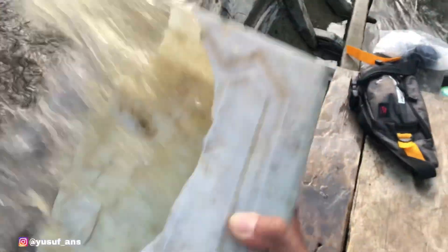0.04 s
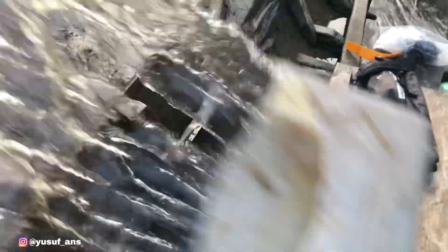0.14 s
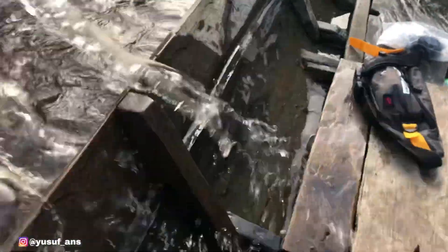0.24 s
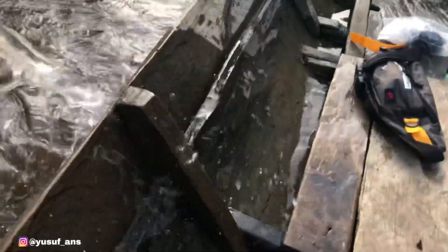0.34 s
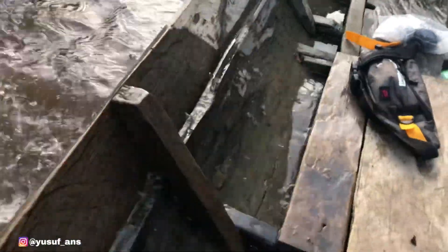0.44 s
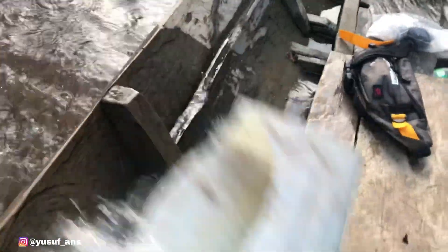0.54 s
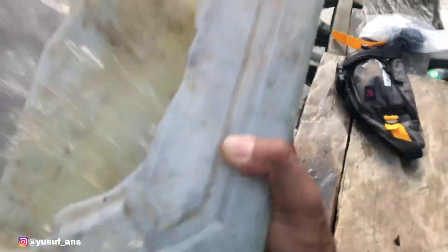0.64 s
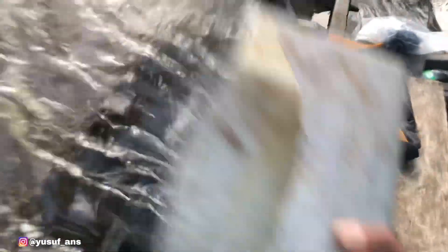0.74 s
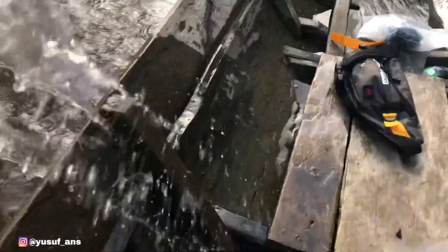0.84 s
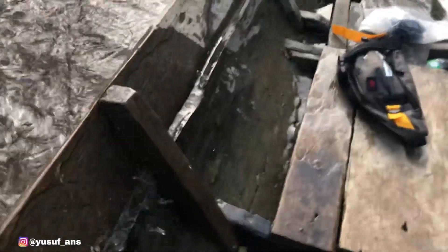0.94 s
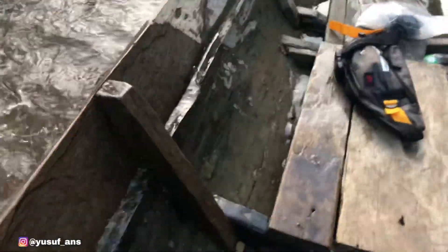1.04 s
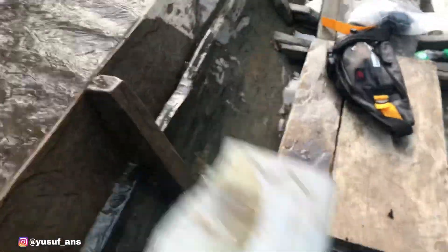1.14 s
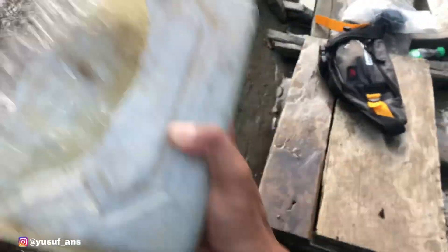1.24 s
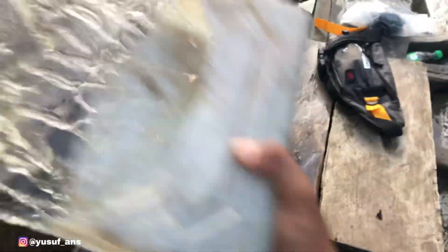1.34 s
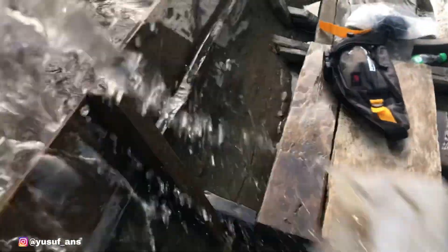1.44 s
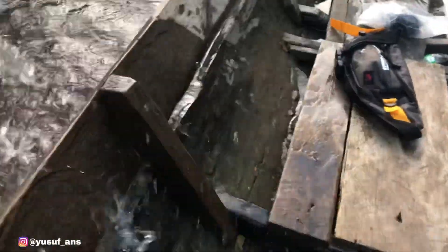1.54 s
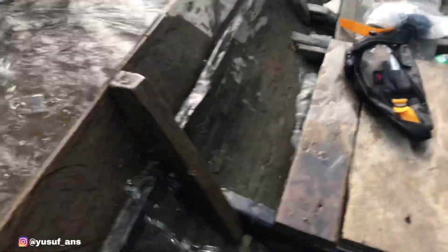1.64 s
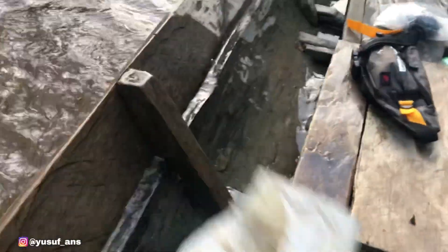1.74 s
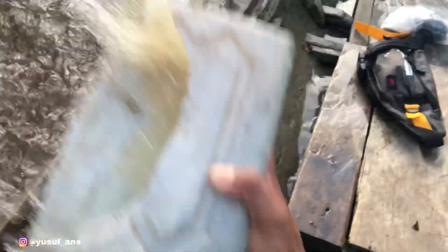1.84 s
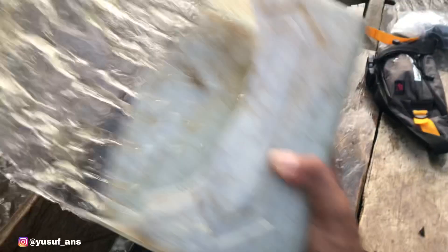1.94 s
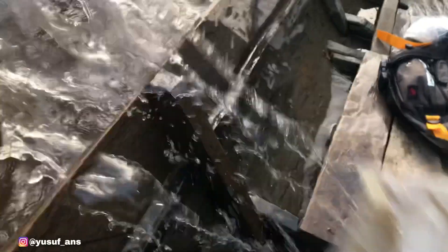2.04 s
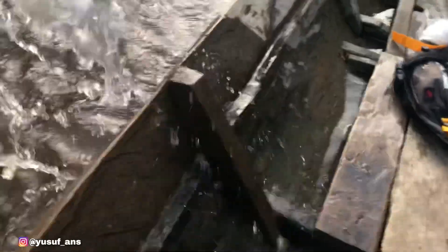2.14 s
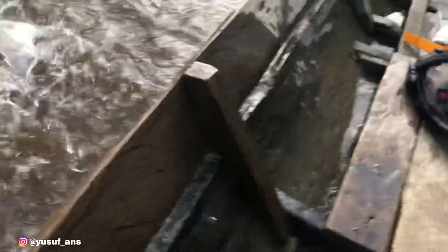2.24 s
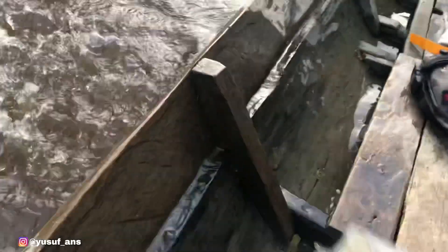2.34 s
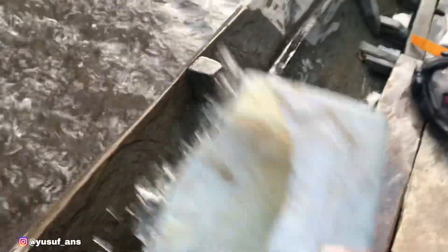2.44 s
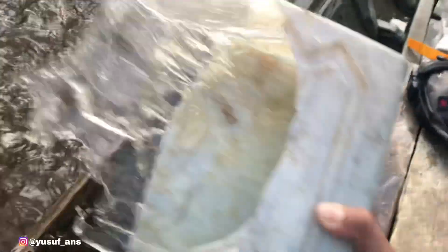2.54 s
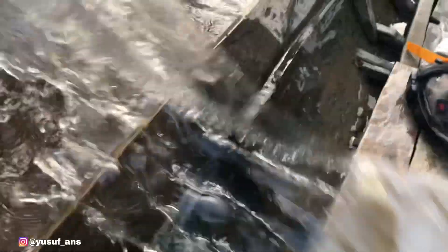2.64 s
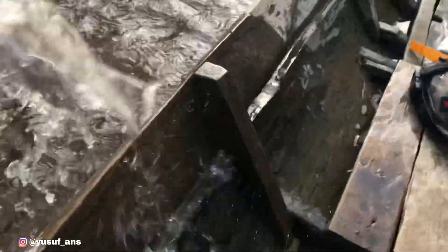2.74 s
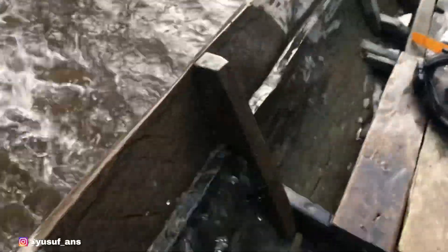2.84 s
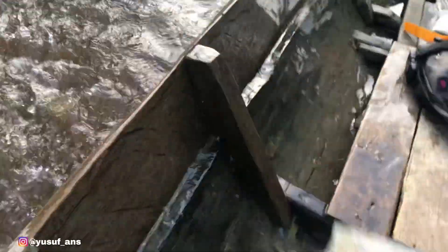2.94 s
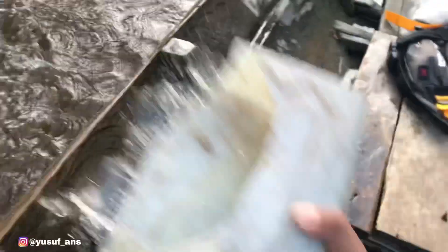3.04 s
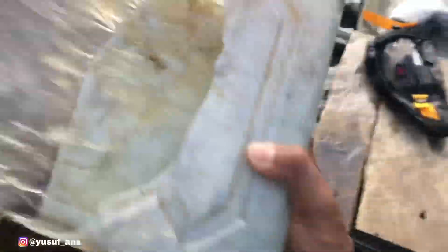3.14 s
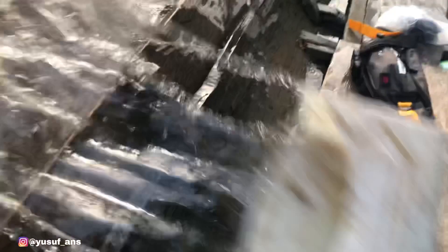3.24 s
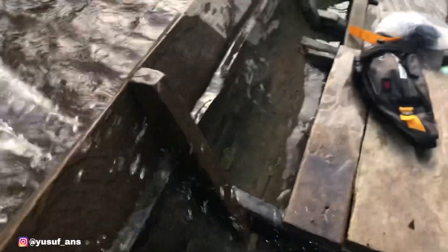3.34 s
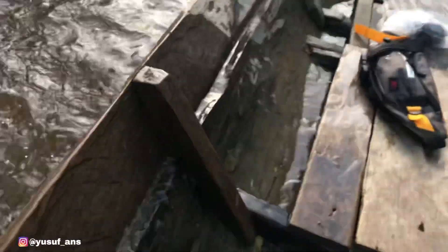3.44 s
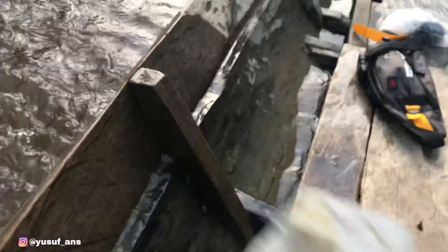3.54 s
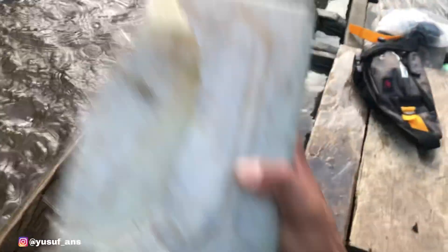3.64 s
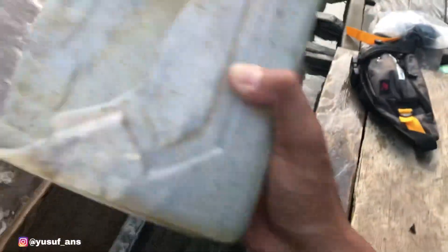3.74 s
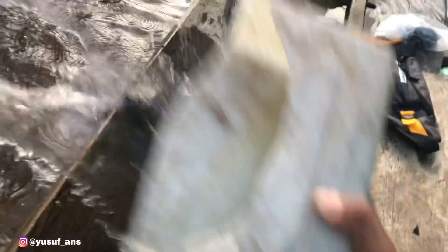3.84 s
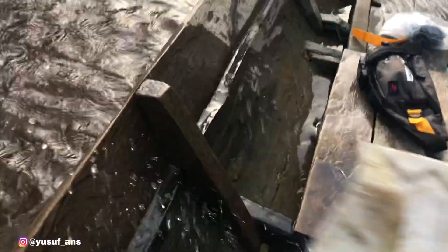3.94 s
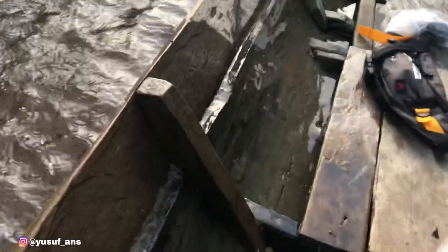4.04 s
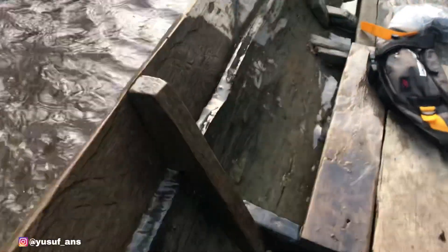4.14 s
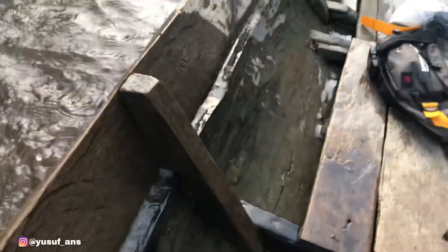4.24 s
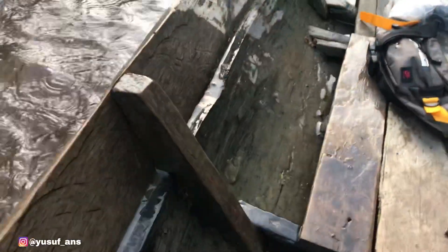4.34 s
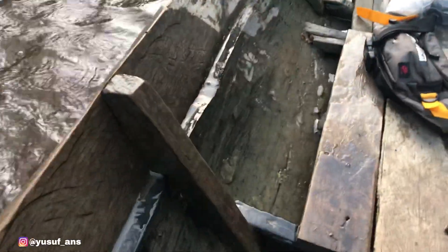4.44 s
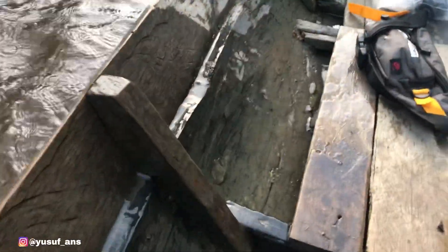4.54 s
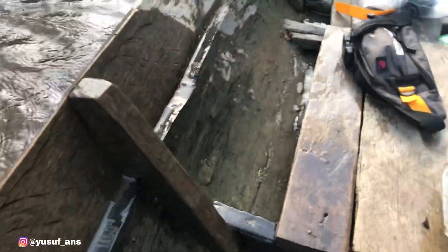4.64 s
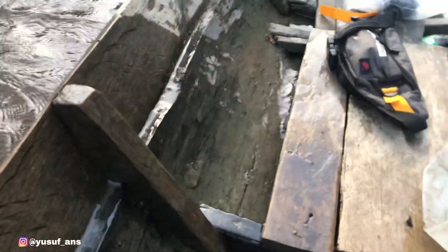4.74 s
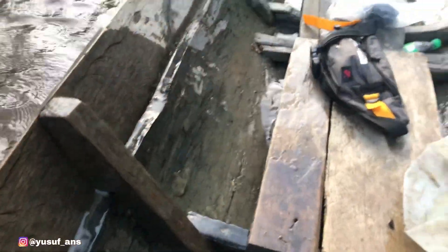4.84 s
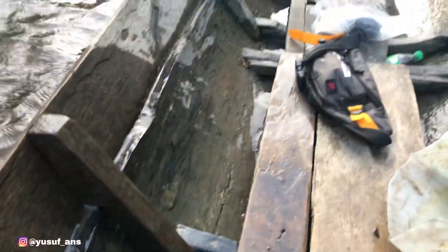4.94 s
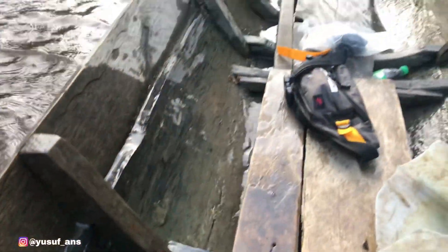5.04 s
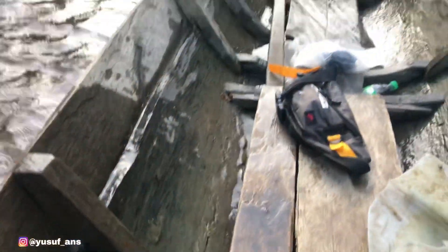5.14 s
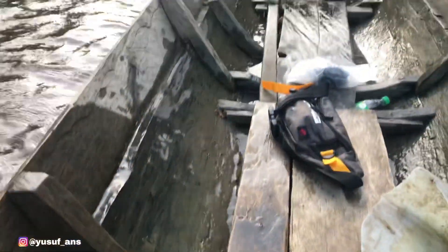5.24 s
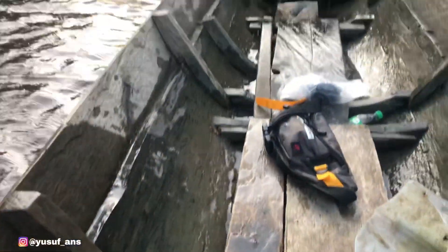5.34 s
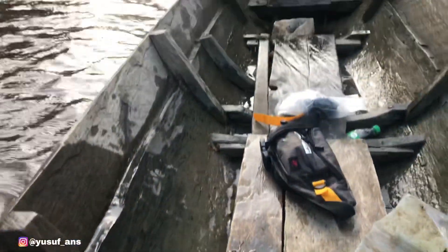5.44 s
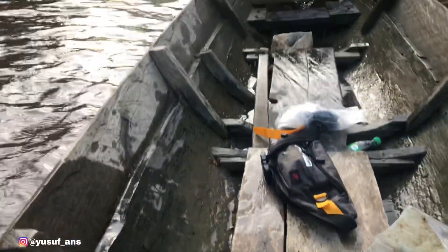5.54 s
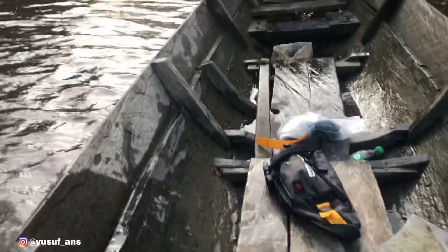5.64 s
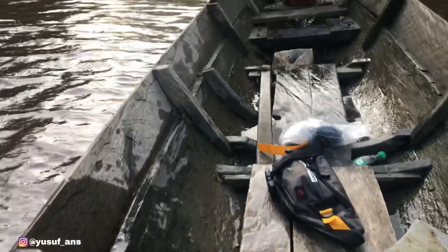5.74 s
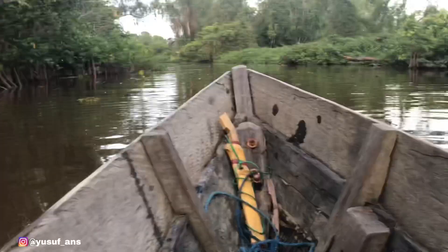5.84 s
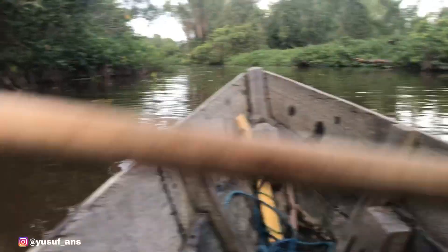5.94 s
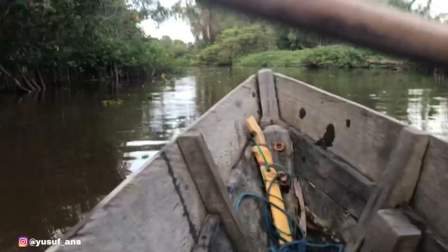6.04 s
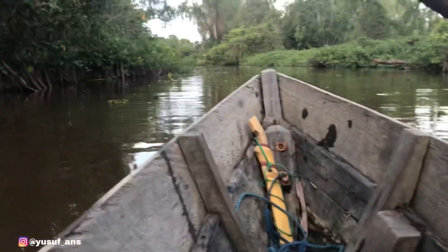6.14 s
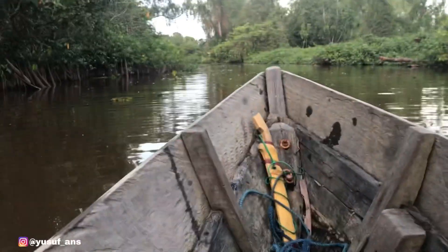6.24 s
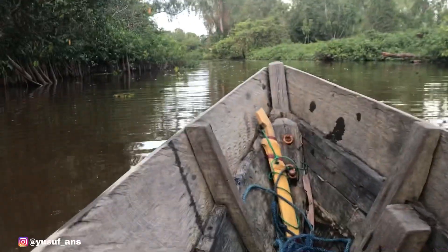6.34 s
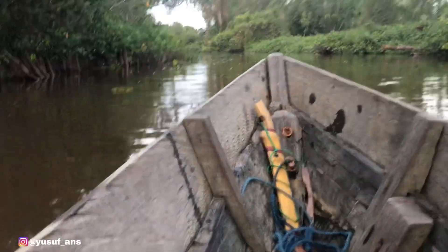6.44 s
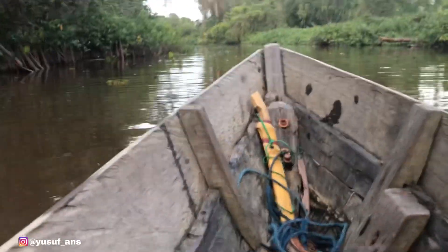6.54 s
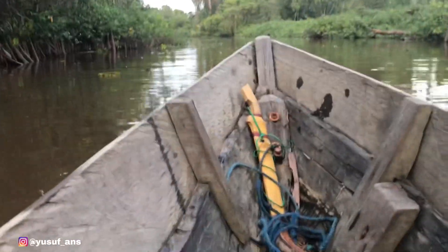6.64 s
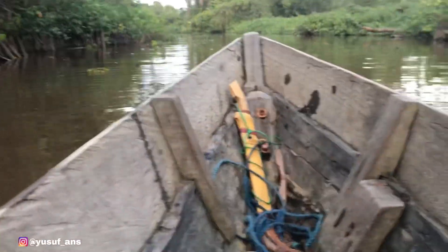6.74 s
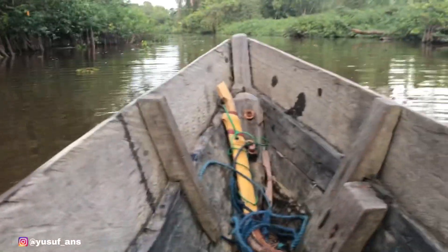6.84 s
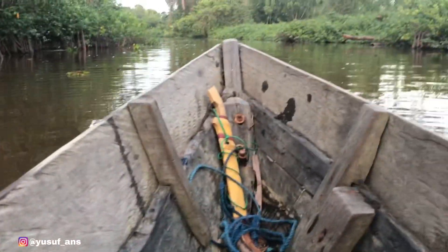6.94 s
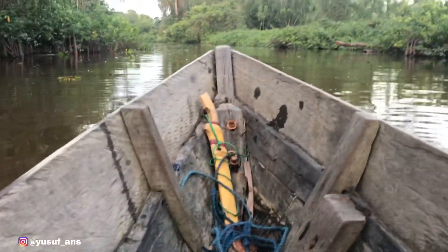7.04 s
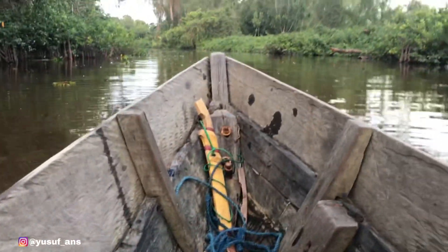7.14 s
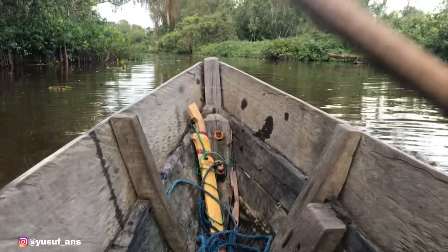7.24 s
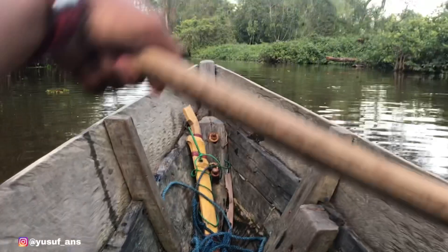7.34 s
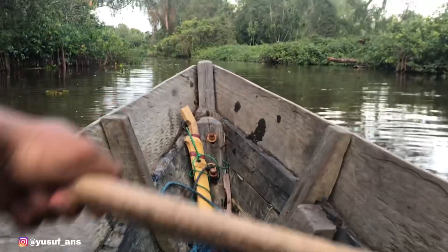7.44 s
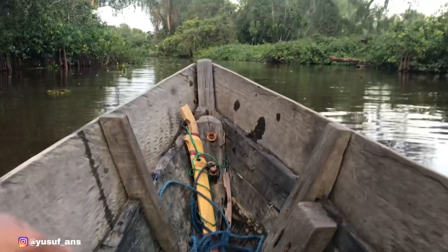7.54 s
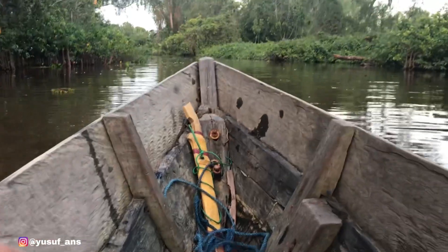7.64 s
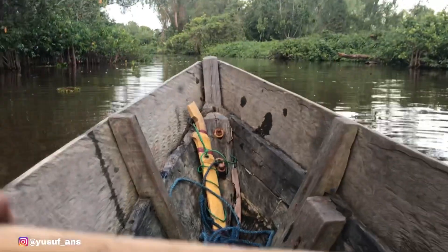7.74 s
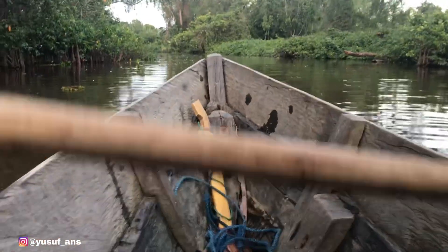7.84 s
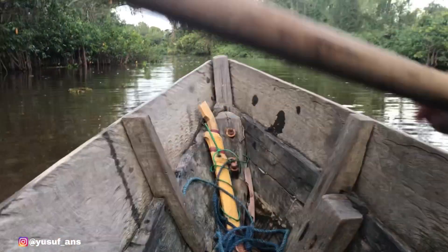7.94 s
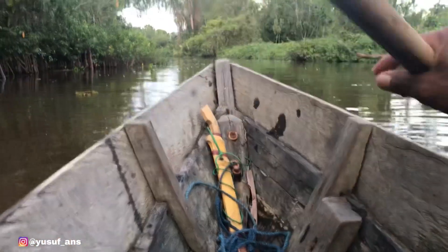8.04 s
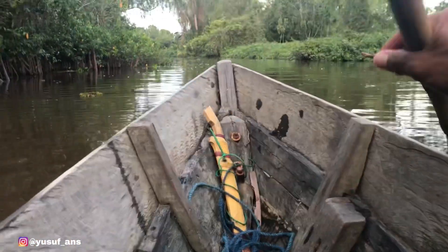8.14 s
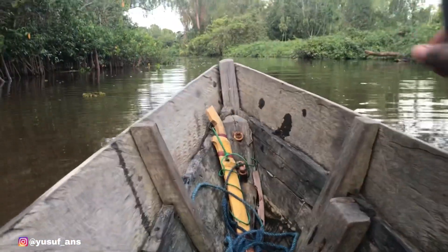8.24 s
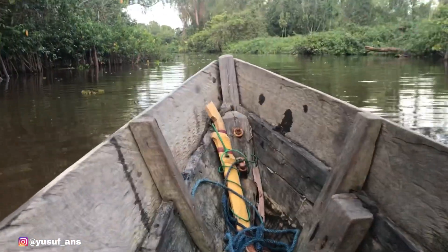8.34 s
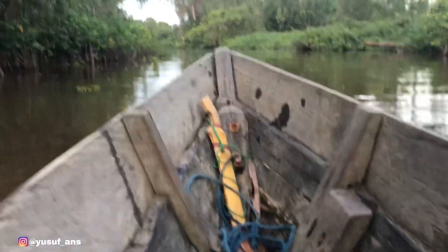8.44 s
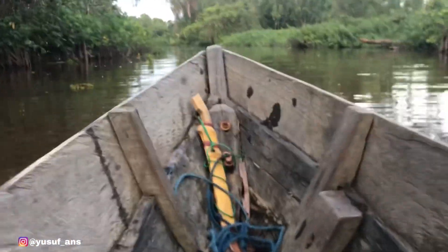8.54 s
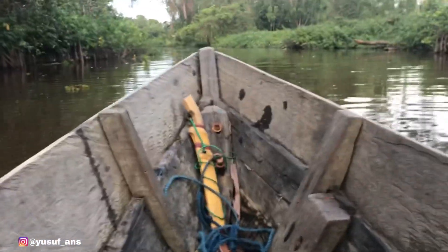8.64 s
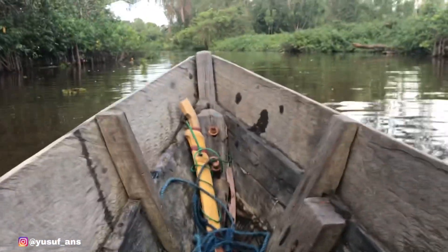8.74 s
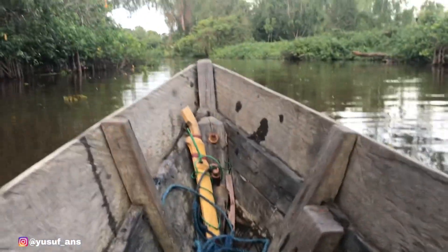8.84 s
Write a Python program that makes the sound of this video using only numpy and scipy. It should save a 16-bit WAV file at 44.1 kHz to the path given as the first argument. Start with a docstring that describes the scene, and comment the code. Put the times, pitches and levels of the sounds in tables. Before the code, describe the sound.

Outdoors on a river in a wooden boat, someone bails quickly: hollow plastic knock, short gritty drag, second strike on a rib, then a bubbly splash with fine spray. After six digs the empty jug bounces and slides on the boards. Then calm air, distant low engine puttering, high insect shrilling, rising bird notes, and two washing, gurgling paddle strokes. The bailing is close and overloads the microphone; the rest is soft.

```python
"""A plastic jug bails a wooden boat close to the microphone: modal knocks and stick-slip scrapes on the planks,
the loudest of them clipping. Each load splashes into the river beside the hull as swarms of bubbles and noise.
The jug is dropped and rattles on its own resonances; then a paddle pulls two gurgling, washing strokes.
Far over the water a slow one-cylinder engine thuds in soft, bell-shaped low tone bursts with weak echoes; on the
bank insects shrill in fluttering narrow bands and a bird whistles rising sweeps, over coloured noise for the air."""
import sys
import numpy as np
from scipy import signal
from scipy.fft import rfft, irfft, next_fast_len
from scipy.io import wavfile
from scipy.ndimage import map_coordinates

SR = 44100
rng = np.random.default_rng(int(sys.argv[2]) if len(sys.argv) > 2 else 0)


def generate_wav(sig):
    """Save sig (samples, or channels by samples) to the path in sys.argv[1] as 16-bit PCM at SR."""
    pcm = np.round(np.clip(np.atleast_2d(sig).T, -1, 1) * 32767).astype(np.int16)
    wavfile.write(sys.argv[1], SR, pcm)


N = 391608
TIME = np.arange(N) / SR

# The jug's resonances, level before random scatter:
# (frequency [Hz], width [Hz], level pressed on the hull [dB], level loose and empty [dB])
JUG_MODES = [(166.4, 35, -8.5, -5.5), (262, 53, -9, -4), (332.8, 50, 1.5, 4), (456.7, 74, 1, -4),
             (558.5, 70, -4, -10.5), (665, 88, -2, -6), (969.5, 66, 0.5, 0.5), (1430, 530, -14, -12.5),
             (1700, 70, -11.5, -15.5), (2083, 45, -10.5, -20.5), (3060, 900, -17.5, -25.5),
             (3902, 82, -16.5, -25)]
# Broad contact noise, before the body's own offset: (frequency [Hz], level [dB])
CONTACT_GRIT = [(40, -14), (100, -9.5), (800, -23), (2000, -13.5), (4200, -16.5), (5200, -22), (7500, -29),
                (10000, -33), (16000, -42.5)]
# Each scoop digs in with a knock, a drag and a rebound; treble sets the spectral tilt:
# (time [s], knock peak [dB], treble setting [dB], drag length [s], drag level [dB], rebound peak [dB])
DIGS = [(0.259, 18, 2.5, .06, -7, 4.5), (0.877, 8.5, -28.5, .1, -9.5, -8),
        (1.503, 8.5, -15, 0.059, -7.5, -2), (2.118, 12.5, -4, 0.03, -2, -7),
        (2.742, 1.5, -18, .033, -3.5, 2.5), (3.362, 11, -4, 0.031, -6.5, -3)]
# Then it is shoved along until it strikes a rib: (time [s], scrape level [dB], strike time [s],
# strike peak [dB], strike treble setting [dB], thud peak [dB])
SHOVES = [(0.36, -6, 0.4, 12, -2.5, -4), (0.984, -6, 1.005, -3, -6.5, 10), (1.562, -9, 1.618, 2, -5.5, -3),
          (2.183, -11.5, 2.246, 7, -24, 9), (2.827, -4, 2.865, 4, -10, 4.5)]
# The dropped jug bounces: (time [s], peak [dB], treble setting [dB])
BOUNCES = [(4.239, -4, -37), (4.361, -5, -35.5), (4.401, -8.5, -14), (4.416, -4, -10), (4.442, -10.5, -16),
           (4.46, 0.5, -10.5), (4.485, -3.5, -25), (4.53, -7.5, -21.5), (4.586, -21.5, -34),
           (4.637, -24, -23)]
# It slides between the bounces: (time [s], length [s], level [dB])
SLIDES = [(4.247, 0.2, -26), (4.398, 0.138, -20.5), (4.563, .1, -34.5)]
# Loads thrown overboard: (leaves the jug [s], bulk lands [s], last of it lands [s],
# splash level [dB], spray level [dB])
THROWS = [(-0.4, -0.199, 0.01, -28, -32.5), (0.199, 0.388, 0.67, -27, -28.5), (0.806, 1.03, 1.27, -28, -29),
          (1.38, 1.626, 1.854, -26, -29), (2.0, 2.25, 2.48, -28, -30), (2.599, 2.86, 2.97, -28.5, -28.5),
          (3.326, 3.434, 3.61, -27.5, -28.5), (4.026, 4.1, 4.17, -40, -35)]
# Colours of the splash and of its fine spray: (frequency [Hz], relative level [dB])
SPLASH_COLOUR = [(150, -28), (320, -10), (700, -15.5), (1000, -8), (1400, -10), (1900, -8.5), (3800, -6),
                 (5500, -9.5), (7500, -11), (12000, -25)]
SPRAY_COLOUR = [(2500, -11.5), (5000, -6.5), (7500, -12.5), (9700, -4.5), (10400, -11), (11500, -4),
                (15500, -8.5)]
# Single drops and plops on water: (time [s], relative level [dB], bubble pitch [Hz])
PLOPS = [(0.061, -12.5, 914), (0.469, -16.5, 840), (0.62, -13, 1900), (1.272, -1, 1830), (1.762, -14, 685),
         (1.893, -16.5, 920), (1.921, -12.5, 2580), (2.416, -15, 1589), (2.613, -18, 3280),
         (3.092, -19, 1950), (3.407, -8, 2940), (3.483, -12, 2140), (4.075, -16, 3780), (5.372, -42, 1400),
         (5.485, -37, 1220), (5.88, -42, 1240), (7.249, -27, 716), (7.284, -21.5, 616), (7.333, -29.5, 528)]
# Stray drops smack on the wood: (time [s], relative level [dB], centre frequency [Hz])
SPATTER = [(0.015, -11.5, 4668), (0.183, -13, 9000), (0.5177, -6.5, 2400), (1.3014, -14.5, 4220),
           (1.834, -5.5, 3740), (2.085, -15.5, 3640), (2.38, -14, 3940), (3.135, -14, 4230),
           (3.494, -11, 4420), (3.983, -16.5, 8380), (5.434, -35, 8020), (6.396, -31, 5970),
           (7.7464, -32, 1830)]
# The small wave's hiss: (frequency [Hz], relative level [dB])
LAP_COLOUR = [(700, -4), (1400, 0), (4000, -3), (7000, -6), (10400, -7.5), (12500, -3), (15500, -8)]
# Paddle strokes: (blade in [s], blade out [s], wash level [dB], gurgle level [dB],
# eddy collapses [s], eddy level [dB])
STROKES = [(6.485, 7.76, -46, -41.5, 7.29, -42.5), (8.269, 9.5, -43.5, -41, 8.87, -25)]
# Churned water, deep water closing behind the blade, and wash: (frequency [Hz], relative level [dB])
GURGLE_COLOUR = [(60, -2), (200, -4), (350, 0), (500, -2), (720, -0.5), (1000, -8), (2000, -26)]
SUCK_COLOUR = [(45, 7), (120, -3), (230, 1), (350, -5), (450, 3), (900, -37)]
WASH_COLOUR = [(500, -16), (1000, 2), (1400, 0), (2600, -2.5), (5000, -2.5), (8000, -8.5), (10500, -13.5),
               (15500, -15)]
# The paddle bumps the hull: (time [s], relative level [dB], treble setting [dB])
BUMPS = [(6.493, -20.5, -59), (8.139, -15.5, -34), (8.572, -26.5, -27.5), (8.843, -17.5, -15),
         (8.873, -27.5, -30)]
# The hull's resonances before random scatter: (frequency [Hz], width [Hz], level [dB])
HULL_MODES = [(199, 38, 7), (263, 50, 1.5), (387, 85, 2), (618, 64, -4.5), (720, 50, -37)]
# The far engine, level before its random scatter:
# (first firing [s], end [s], period [s], level [dB], thud pitch [Hz])
ENGINE_RUNS = [(.04, 5.8, .07065, -37, 114.8), (5.876, 8.88, .0711, -30, 160.7)]
# Loudness of the insect chorus: (time [s], relative level [dB])
INSECT_LEVEL = [(2.9, -51), (3.7, -46), (4.1, -46), (4.6, -54), (5.05, -45.5), (5.7, -50.5), (6.05, -56.5),
                (6.8, -53.5), (8.88, -56)]
# Centre of the chorus's band: (time [s], frequency [Hz])
SHRILL_PITCH = [(0, 8280), (5.78, 8295), (5.82, 8160), (8.88, 8140)]
# Rising bird notes, before the flutter: (time [s], length [s], first pitch [Hz], last pitch [Hz], level [dB])
BIRD_NOTES = [(4.196, .18, 2864, 4260, -36), (6.495, 0.04, 4900, 6170, -42.5),
              (6.678, 0.038, 4900, 6240, -47), (6.902, 0.036, 4900, 6200, -46)]
# Colour of the open air: (frequency [Hz], relative level [dB])
AIR_COLOUR = [(25, -33), (50, -14.5), (80, 5), (125, -4), (175, -12), (260, -9.5), (500, -23.5),
              (1400, -30), (2500, -32.5), (4800, -35), (6800, -31), (9000, -45.5), (10400, -46.5),
              (15500, -38)]
# Loudness of the open air: (time [s], level [dB])
AIR_LEVEL = [(0, -43), (4.6, -47.5), (5.78, -47), (5.85, -49.5), (8.88, -47)]

# The jug on the planks; FADE and GROW are over one scrape, TILT is per octave in the treble.
LET_GO = 4.2  # the jug is dropped (s)
DRAG_FADE_DB, DRAG_TILT_DB = -3, 1.1
DRAG_TILT_FOLLOWS = 0.11  # a brighter dig drags brighter too (tilt dB for each dB of treble)
REBOUND_SHARE, REBOUND_TREBLE_DB = .66, -29  # the jug comes down again this far into the drag
SHOVE_GROW_DB, SHOVE_TILT_DB = 2, 2.04
SHOVE_AFTER_S = .01  # the shove carries on this long past the strike
THUD_LEAD_S, THUD_TREBLE_DB = .02, -36.5  # the load thuds in the jug just before the strike
LIFT_S, LIFT_DB, LIFT_FADE_DB, LIFT_TILT_DB = .035, -25.5, -11.5, -.5  # the rim grazes as the jug is lifted
SLIDE_FADE_DB, SLIDE_TILT_DB = -3.5, -7

# Thrown water: first drops below the peak, then thinning out, then dying away.
SPLASH_LEAD_DB, SPLASH_SAG_DB_PER_S, SPLASH_STOP_DB_PER_S = -18, 15, 93.5
SPRAY_LEAD_DB, SPRAY_SAG_DB_PER_S, SPRAY_STOP_DB_PER_S = -8.5, 29, 170
ONSET_S = 0.0071  # fade-in of any rush of water
TRICKLE_DB, TRICKLE_SPRAY_DB, SETTLE_DB_PER_S = -47, -50, 17.5  # run-off; it settles after the drop
DRIP_DB, DRIP_FOLLOWS = -38, .8  # sparse ringing drips; how closely they follow the splash level
LAP_START_S, LAP_END_S, LAP_DB = 4.68, 5.22, -49.5

# The paddle's water.
CATCH_DB, CATCH_WASH_DB, CATCH_DB_PER_S = 9, 0, 192  # slap of the entering blade, over the stroke's levels
PULL_PEAK_S, PULL_LEAD_DB, PULL_SAG_DB_PER_S = 0.18, -6.5, 4  # the wash swells with the pull
PULL_EASE_S, PULL_EASE_DB_PER_S = .17, 50  # and eases from this long before the eddy
CHURN_PEAK_S, CHURN_LEAD_DB, CHURN_SAG_DB_PER_S = 0.55, -4.5, 13.5  # the gurgle peaks later
EDDY_S = .06  # spread (standard deviation) of the eddy's collapse
DRAIN_PEAK_S, DRAIN_LEAD_DB, DRAIN_SAG_DB_PER_S = 0.13, -8.5, 25  # run-off peaks this long before the exit
DRAIN_DB, DRAIN_WASH_DB = -47, -47  # its bubbles and its hiss
EXIT_DB_PER_S = 244  # the water falls quiet once the blade is out

TOP_HZ = 15900  # band limit


def scoops():
    """The jug digs in, drags and rebounds; then it is shoved against a rib and lifted."""
    out = np.zeros(N)
    for s, knock_db, treble_db, length, drag_db, rebound_db in DIGS:
        drag_tilt_db = DRAG_TILT_DB + DRAG_TILT_FOLLOWS * treble_db
        add(out, s, knock(s, knock_db, treble_db))
        add(out, s, scrape(s, length, drag_db, DRAG_FADE_DB, drag_tilt_db))
        add(out, s + REBOUND_SHARE * length, knock(s, rebound_db, REBOUND_TREBLE_DB))
    for s, scrape_db, strike_s, strike_db, treble_db, thud_db in SHOVES:
        length = strike_s + SHOVE_AFTER_S - s
        add(out, s, scrape(s, length, scrape_db, SHOVE_GROW_DB, SHOVE_TILT_DB))
        add(out, strike_s - THUD_LEAD_S, knock(s, thud_db, THUD_TREBLE_DB))
        add(out, strike_s, knock(s, strike_db, treble_db))
        add(out, s + length, scrape(s, LIFT_S, LIFT_DB, LIFT_FADE_DB, LIFT_TILT_DB))
    return out


def dropped_jug():
    """The empty jug bounces and slides to rest on the boards."""
    out = np.zeros(N)
    for s, db, treble_db in BOUNCES:
        add(out, s, knock(s, db, treble_db))
    for s, length, db in SLIDES:
        add(out, s, scrape(s, length, db, SLIDE_FADE_DB, SLIDE_TILT_DB))
    return out


def knock(s, db, treble_db):
    """The jug strikes the wood, a harder contact tilting it brighter; once dropped it chatters longer."""
    body = jug_ring(s, 0.26 * (treble_db + 17.0))
    if s < LET_GO:
        return blow(body, db, chatter_db=-17.5, chatter_t60=0.026)
    return blow(body, db, chatter_db=-16.5, chatter_t60=0.049)


def scrape(start, length, db, change_db, tilt_db):
    """The jug sticks and slips along the wood, each slip exciting its resonances, bright at first then duller."""
    t = np.arange(SR // 4) / SR
    length = max(length, .005)
    hard_slips = rng.random(len(t)) < 1100 / SR  # about 1100 a second
    slips = hard_slips + 0.038 * rng.standard_normal(len(t))  # over fine grit
    grip = (1 - np.exp(-t / .002)) * np.exp(-np.maximum(t - length, 0) / 0.0033)
    force = unit(slips - slips.mean()) * grip * amp(db + change_db * np.minimum(t / length, 1))
    soft = signal.lfilter(*signal.butter(1, 1400, fs=SR), force)
    force = soft + (force - soft) * np.exp(-.7 * t / length)
    body = jug_ring(start, tilt_db)
    return signal.fftconvolve(force, body / np.linalg.norm(body))


def jug_ring(s, tilt_db):
    """The jug rings with the hull while it is held, and on its own once dropped."""
    held = s < LET_GO
    modes = [(hz, width, held_db if held else loose_db) for hz, width, held_db, loose_db in JUG_MODES]
    return ring(modes, tilt_db, grit_db=-5.5 if held else -9)


def blow(body, db, chatter_db, chatter_t60):
    """A contact chatters briefly; its main push lands just after the first touch."""
    t = np.arange(SR // 16) / SR
    chatter_gain = amp(chatter_db - 60 * t / chatter_t60) * (1 - np.exp(-t / 0.003))
    force = chatter_gain * rng.standard_normal(len(t))
    force[SR // 600] += 1  # the main push
    sound = signal.fftconvolve(force, body)
    return amp(db) * sound / np.abs(sound).max()


def ring(modes, tilt_db, grit_db, scatter_db=3.0, detune=0.039, size=4096):
    """Causal answer of a body to a tap; spot and water load shift the modes, hard contact tilts them up."""
    hz = np.fft.rfftfreq(size, 1 / SR) + 1
    power = amp(along(CONTACT_GRIT, hz) + grit_db) ** 2
    for centre, width, db in modes:
        centre = centre * np.exp(detune * rng.normal())
        peak_power = amp(db + scatter_db * rng.normal()) ** 2
        resonance = 1 + (2 * (hz - centre) / width) ** 2
        skirt = 1 + (2 * np.log2(hz / centre)) ** 2
        power = power + peak_power / resonance / skirt
    tilt = amp(tilt_db * np.log2(1 + hz / 500))
    gain = np.sqrt(power) * tilt / (1 + (65 / hz) ** 4)
    # folding the cepstrum gives minimum phase: the ring starts at once
    cepstrum = irfft(np.log(gain + 1e-6))
    cepstrum[1:size // 2] *= 2
    cepstrum[size // 2 + 1:] = 0
    return irfft(np.exp(rfft(cepstrum)))


def splashes():
    """Thrown water lands as a swarm of bubbles on a rush, with a crackle of fine spray."""
    splash_gain, spray_gain = falling_water()
    swarm = bubbles(5000, hz=2000, spread=.65, cycles=22, rise=.2, size_db=3)
    patter = bubbles(9000, hz=3016, spread=.7, cycles=1.5, rise=0.082, size_db=5.0, order=120)
    rush = rng.standard_normal(N)
    splash = coloured(swarm + amp(-4.5) * patter + amp(2) * rush, SPLASH_COLOUR)
    crackle = bubbles(20000, hz=7740, spread=0.36, cycles=6.9, rise=.1, size_db=5.5, order=60)
    spray = coloured(crackle + amp(-2.5) * rng.standard_normal(N), SPRAY_COLOUR)
    clumps = amp(2.5 * wobble(55))  # the sheet of water breaks into lumps
    spurts = amp(3.1 * wobble(110))
    drips = bubbles(400, hz=1970, spread=.45, cycles=33, rise=.25, size_db=3.0, order=1100)
    drip_gain = amp(DRIP_DB) * (splash_gain / splash_gain.max()) ** DRIP_FOLLOWS * (TIME < LET_GO)
    return clumps * (splash_gain * splash + spray_gain * spurts * spray) + drip_gain * drips


def falling_water():
    """Gains of splash and spray: throws swell and die over a trickle that settles when the bailing stops."""
    settle = amp(-SETTLE_DB_PER_S * np.maximum(TIME - LET_GO, 0))
    splash, spray = [amp(TRICKLE_DB) * settle], [amp(TRICKLE_SPRAY_DB) * settle]
    for start, lands, end, splash_db, spray_db in THROWS:
        splash_surge = surge(start, lands, end, SPLASH_LEAD_DB, SPLASH_SAG_DB_PER_S, SPLASH_STOP_DB_PER_S)
        spray_surge = surge(start, lands, end, SPRAY_LEAD_DB, SPRAY_SAG_DB_PER_S, SPRAY_STOP_DB_PER_S)
        splash.append(amp(splash_db) * splash_surge)
        spray.append(amp(spray_db) * spray_surge)
    return np.linalg.norm(splash, axis=0), np.linalg.norm(spray, axis=0)  # powers add


def surge(start, peak, end, lead_db, sag_db_per_s, stop_db_per_s):
    """Gain of a rush of water: it sets in, swells to its peak, sags, and dies after its end."""
    gain, heard = np.zeros(N), (TIME > start) & (TIME < end + 1)
    t = TIME[heard]
    rise_db = lead_db * np.clip((peak - t) / (peak - start), 0, 1)
    fall_db = sag_db_per_s * np.maximum(t - peak, 0) + stop_db_per_s * np.maximum(t - end, 0)
    gain[heard] = np.minimum((t - start) / ONSET_S, 1) * amp(rise_db - fall_db)
    return gain


def plops():
    """A drop on water smacks and traps one ringing bubble; on wood it only smacks."""
    out, t = np.zeros(N), np.arange(SR // 12) / SR
    for s, db, hz in PLOPS:
        trapped = bubble(t, hz, cycles=31.5, rise=0.24)
        add(out, s, amp(db - 3.5) * (trapped + amp(-5) * smack(t, hz, t60=0.041)))
    for s, db, hz in SPATTER:
        add(out, s, amp(db - 3) * smack(t, hz, t60=0.024))
    return out


def smack(t, hz, t60):
    """A short burst of water noise around one frequency, peak 1."""
    band = signal.butter(1, [hz / 2, min(2 * hz, SR / 2.2)], "band", fs=SR)
    burst = signal.lfilter(*band, amp(-60 * t / t60) * rng.standard_normal(len(t)))
    return burst / np.abs(burst).max()


def bubble(t, hz, cycles, rise):
    """A bubble rings for some cycles and climbs in pitch as it nears the surface."""
    age = t * hz / cycles
    tone = np.sin(2 * np.pi * hz * t * (1 + rise * np.minimum(age, 2) / 2))
    decay = amp(-40 * np.minimum(age, 10))
    attack = 1 - np.exp(-np.minimum(2 * t * hz, 20))
    return tone * decay * attack


def bubbles(count, hz, spread, cycles, rise, size_db, order=640):
    """A steady swarm of bubbles with scattered pitch, life and size, at rms 1; order is samples each."""
    start = rng.integers(0, N, (count, 1))
    pitch = np.clip(hz * np.exp(spread * rng.standard_normal((count, 1))), 150, 14000)
    life = cycles * np.exp(.5 * rng.standard_normal((count, 1)))
    size = amp(size_db * np.minimum(rng.exponential(1, (count, 1)), 4))
    k = np.arange(order)
    fade = 1 - (k / order) ** 2
    grains = size * bubble(np.float32(k / SR), np.float32(pitch), np.float32(life), rise) * fade
    return unit(np.bincount((start + k).ravel(), grains.ravel(), N + order)[:N])


def lap():
    """A small wave passes along the hull with a smooth hiss of coloured noise."""
    u = np.clip((TIME - LAP_START_S) / (LAP_END_S - LAP_START_S), 0, 1)
    hiss = coloured(rng.standard_normal(N), LAP_COLOUR)
    return amp(LAP_DB) * np.sqrt(np.abs(np.sin(np.pi * u))) * hiss


def paddle():
    """The blade churns bubbles under a soft wash of froth and noise, and the paddle bumps the ringing hull."""
    churn = bubbles(2200, hz=507, spread=.55, cycles=14.5, rise=0.121, size_db=1.5, order=900)
    gurgle = coloured(churn + .9 * rng.standard_normal(N), GURGLE_COLOUR)
    gulps = bubbles(1200, hz=242.4, spread=0.2, cycles=2.8, rise=.1, size_db=2.5, order=1000)
    suck = coloured(gulps + .6 * rng.standard_normal(N), SUCK_COLOUR)
    froth = bubbles(3000, hz=2062, spread=.7, cycles=14.7, rise=0.202, size_db=0.5, order=360)
    wash = coloured(froth + 2.7 * rng.standard_normal(N), WASH_COLOUR) * amp(1.7 * wobble(16))
    runoff = bubbles(2400, hz=1350, spread=0.347, cycles=12, rise=.2, size_db=0.5, order=400)
    out = np.zeros(N)
    for row in STROKES:
        gurgle_gain, wash_gain, drain_gain = stroke(*row)
        gurgle_db = 20 * np.log10(gurgle_gain + 1e-9)
        depth = np.clip(0.25 + (gurgle_db + 45) / 35, .1, .8)  # a harder pull frees bigger, deeper bubbles
        eddy = np.sqrt(1 - depth) * gurgle + np.sqrt(depth) * suck
        out += gurgle_gain * eddy + wash_gain * wash + drain_gain * runoff
    for s, db, treble_db in BUMPS:
        body = ring(HULL_MODES, .12 * (treble_db + 25), grit_db=-24, scatter_db=1.5)
        add(out, s, blow(body, db + 4.5, chatter_db=-27.5, chatter_t60=0.066))
    return out


def stroke(start, end, wash_db, gurgle_db, eddy_s, eddy_db):
    """Gains of gurgle, wash and run-off: the blade slaps in, pulls, sheds an eddy and drains as it rises."""
    catch = (TIME > start) * amp(-CATCH_DB_PER_S * np.maximum(TIME - start, 0))
    pull = surge(start, start + PULL_PEAK_S, eddy_s - PULL_EASE_S,
                 PULL_LEAD_DB, PULL_SAG_DB_PER_S, PULL_EASE_DB_PER_S)
    churn = surge(start, start + CHURN_PEAK_S, end, CHURN_LEAD_DB, CHURN_SAG_DB_PER_S, EXIT_DB_PER_S)
    drain = surge(eddy_s, end - DRAIN_PEAK_S, end, DRAIN_LEAD_DB, DRAIN_SAG_DB_PER_S, EXIT_DB_PER_S)
    collapse = swell(eddy_s, EDDY_S)
    gurgle = [amp(gurgle_db + CATCH_DB) * catch, amp(gurgle_db) * churn, amp(eddy_db) * collapse]
    wash = [amp(wash_db + CATCH_WASH_DB) * catch, amp(wash_db) * pull, amp(DRAIN_WASH_DB) * drain]
    return np.linalg.norm(gurgle, axis=0), np.linalg.norm(wash, axis=0), amp(DRAIN_DB) * drain


def swell(s, width):
    """Gain of a smooth swell around time s."""
    return np.exp(-np.minimum(((TIME - s) / width) ** 2 / 2, 20))


def insects():
    """A chorus shrills in one narrow band, each quick pulse sliding down; a fainter kind sings lower."""
    shrill_hz = curves(SHRILL_PITCH)[0]
    cycle = np.cumsum(38 * np.exp(0.34 * wobble(25))) / SR % 1  # about 38 pulses a second
    near_hz = shrill_hz + 750 * (.5 - cycle) + 110 * wobble(60)
    near = np.sin(np.pi * cycle) ** 2 * sine(near_hz)
    chorus = wobble(800) * sine(shrill_hz + 120 * wobble(200))
    lower = wobble(700) * sine(6900 + 200 * wobble(2.8))
    mix = unit(near) + amp(0.5) * unit(chorus) + amp(-14.0) * unit(lower)
    return amp(curves(INSECT_LEVEL)[0] - 3.5) * unit(mix)


def bird():
    """Whistles sweep up and level off, fluttering; the top of each note lingers among the trees."""
    notes, tops = np.zeros(N), np.zeros(N)
    for s, length, first_hz, last_hz, db in BIRD_NOTES:
        u = np.linspace(0, 1, round(length * SR))
        hz = first_hz + (last_hz - first_hz) * np.sin(np.pi / 2 * np.minimum(u / .95, 1) ** 1.2)
        note = amp(db) * np.sqrt(np.abs(np.sin(np.pi * u ** 1.7))) * sine(hz)
        add(notes, s, note)
        add(tops, s, note * u ** 2)
    t = np.arange(SR) / SR
    trees = rng.standard_normal(SR) * amp(-60 * t / 0.99)  # decaying noise echo
    lingering = signal.fftconvolve(tops, trees / np.linalg.norm(trees))[:N]
    return notes * amp(5.6 * wobble(160)) + amp(5) * lingering


def engine():
    """Only the low thud of each firing carries over the water; the banks return it weakly."""
    out, t = np.zeros(N), np.arange(-SR // 50, SR // 12) / SR
    for first, end, period, db, hz in ENGINE_RUNS:
        echo_near = 0.11 * thud(t - 0.022, hz, .007)
        echo_far = 0.12 * thud(t - .033, hz, .009)
        firing = thud(t, hz, 0.0044) + echo_near + echo_far
        for s in np.arange(first, end, period):
            add(out, s + t[0], amp(db + 1.8 * rng.normal()) * firing)
    return out


def thud(t, hz, width):
    """A low tone under a bell-shaped envelope around t = 0, a single soft push of pressure."""
    return -np.sin(2 * np.pi * hz * t + np.pi / 2) * np.exp(-(t / width) ** 2)


def open_air():
    """The place itself: coloured noise with a level that drifts and drops quickly once near 5.8 s."""
    return amp(curves(AIR_LEVEL)[0]) * coloured(rng.standard_normal(N), AIR_COLOUR)


def amp(db):
    """Decibels to gain."""
    return np.exp(np.asarray(db) * float(np.log(10) / 20))


def unit(x):
    """x at rms 1."""
    return x / np.sqrt(np.mean(x ** 2) + 1e-20)


def sine(hz):
    """A sine whose pitch follows hz sample by sample."""
    return np.sin(2 * np.pi * np.cumsum(hz) / SR)


def along(points, hz):
    """(Hz, value) points read off on a log axis."""
    f, v = np.transpose(points)
    return np.interp(np.log(hz + 1), np.log(f + 1), v)


def curves(rows):
    """One value per sample for each column after the time."""
    s, *cols = np.transpose(rows)
    return [np.interp(TIME, s, c) for c in cols]


def wobble(rate):
    """A smooth random curve, rate knots a second."""
    coarse = TIME[::8]
    knots = rng.standard_normal(int(N * rate / SR) + 4)
    return np.interp(TIME, coarse, map_coordinates(knots, [coarse * rate], order=2))


def add(track, s, sound):
    """Mix a sound in at time s."""
    part = track[max(round(s * SR), 0):][:len(sound)]
    part += sound[:len(part)]


def filtered(x, response):
    """x times a response of frequency."""
    m = next_fast_len(N + SR // 4)
    return irfft(rfft(x, m) * response(np.fft.rfftfreq(m, 1 / SR)), m)[:N]


def coloured(x, spectrum):
    """x in the given colour, falling steeply below it, at rms 1."""
    lowest_hz = spectrum[0][0]
    return unit(filtered(x, lambda hz: amp(along(spectrum, hz)) * np.minimum(hz / lowest_hz, 1) ** 2))


def scene():
    """Jug, water and paddle close by; insects, bird, far engine and open air behind them."""
    boat = scoops() + dropped_jug()
    water = splashes() + plops() + lap() + paddle()
    background = insects() + bird() + engine() + open_air()
    return (boat + water + background)[None]


def record(dry):
    """The microphone overloads: peaks clip at full scale, and nothing is kept above the band limit."""
    clipped = np.clip(dry[0], -1, 1)
    return filtered(clipped, lambda hz: hz < TOP_HZ)[None]


dry = scene()
out = record(dry)
generate_wav(out)
```